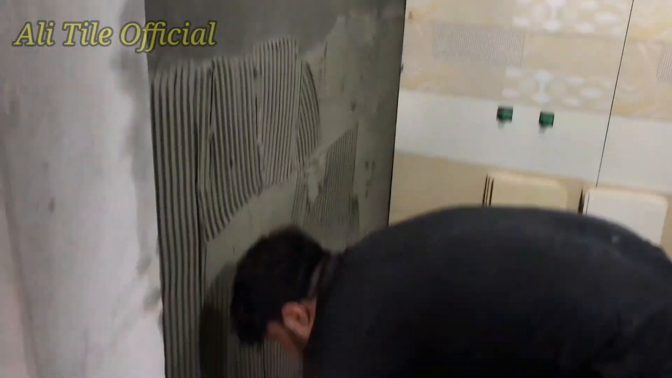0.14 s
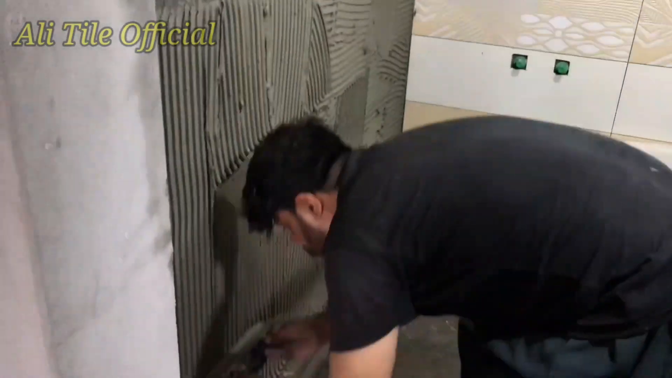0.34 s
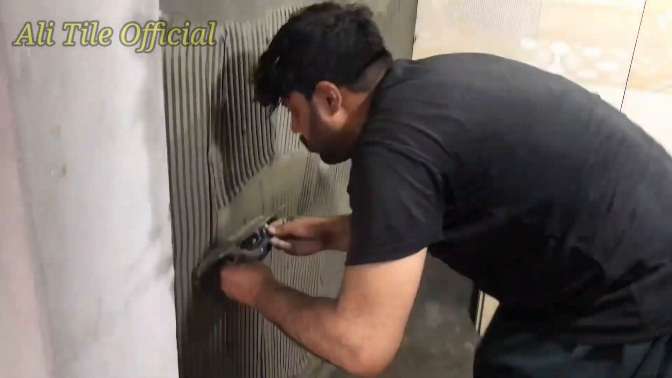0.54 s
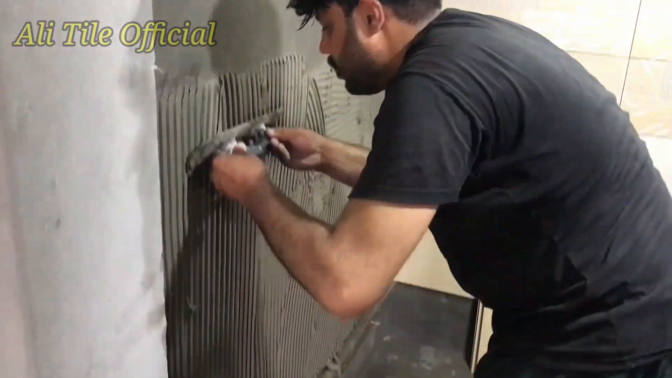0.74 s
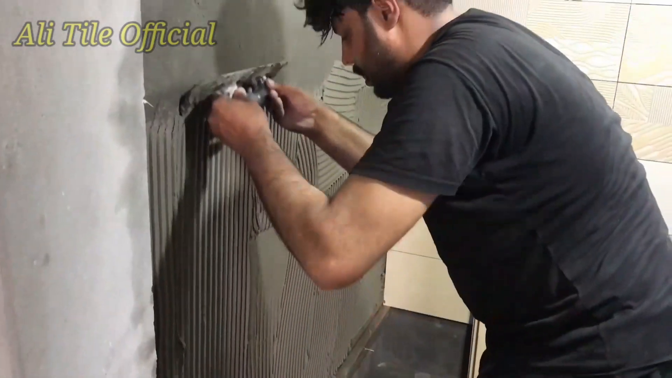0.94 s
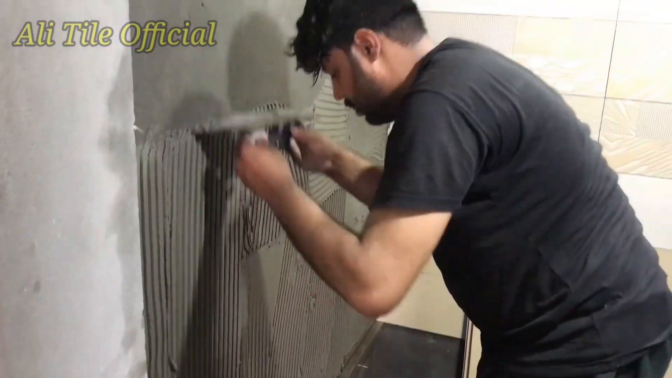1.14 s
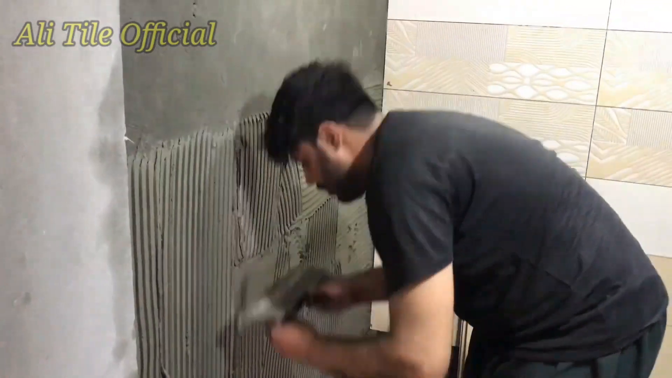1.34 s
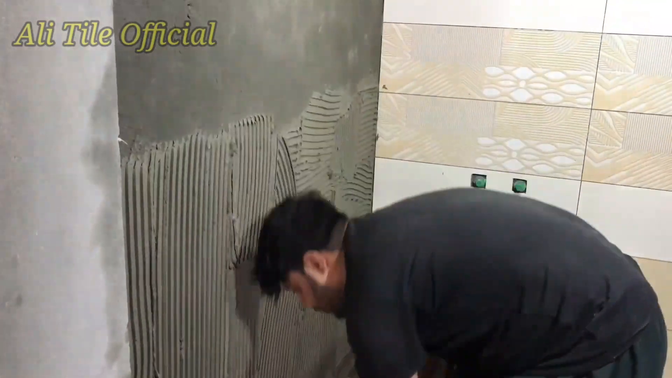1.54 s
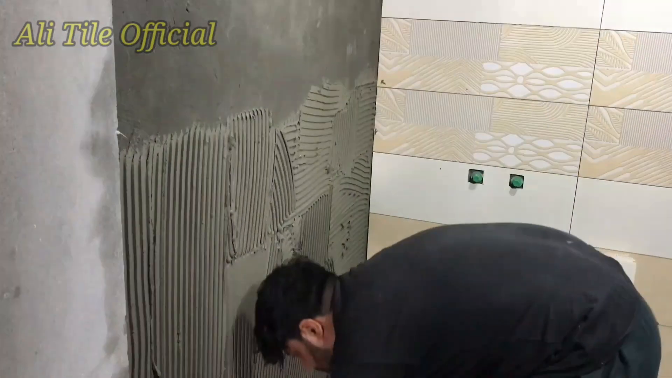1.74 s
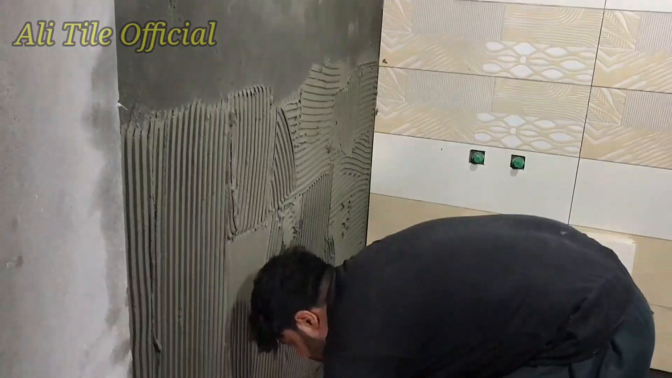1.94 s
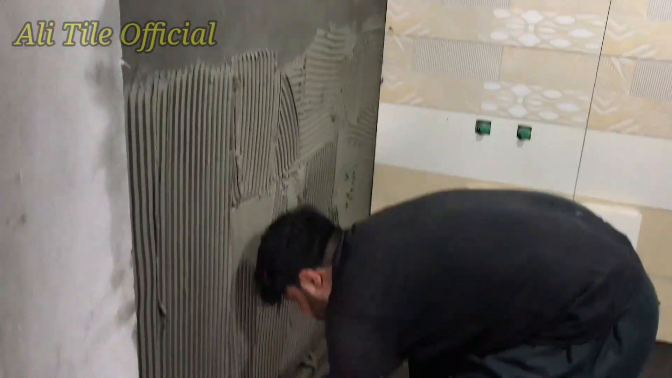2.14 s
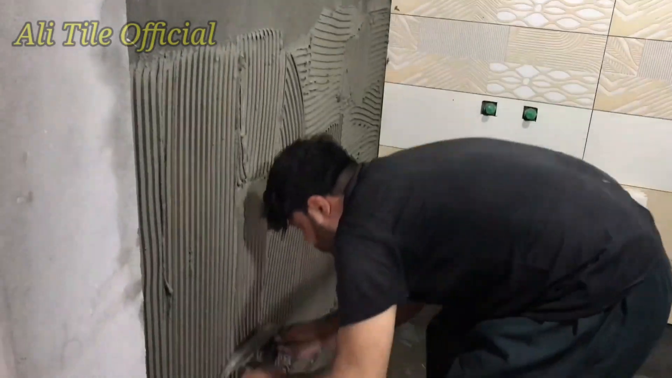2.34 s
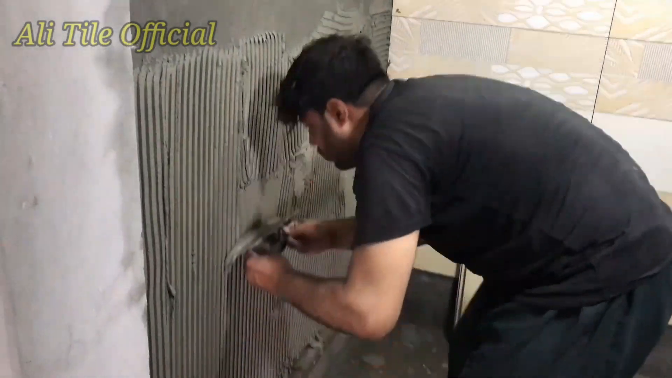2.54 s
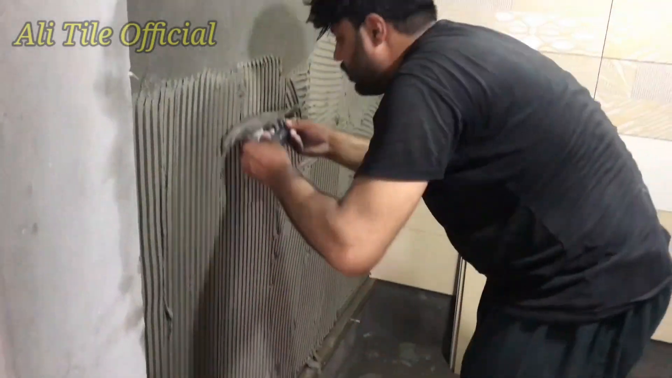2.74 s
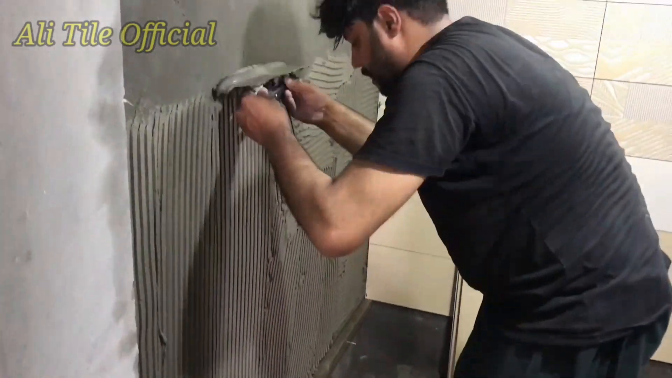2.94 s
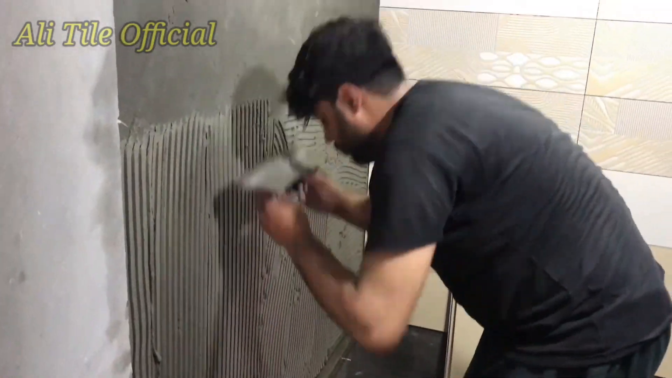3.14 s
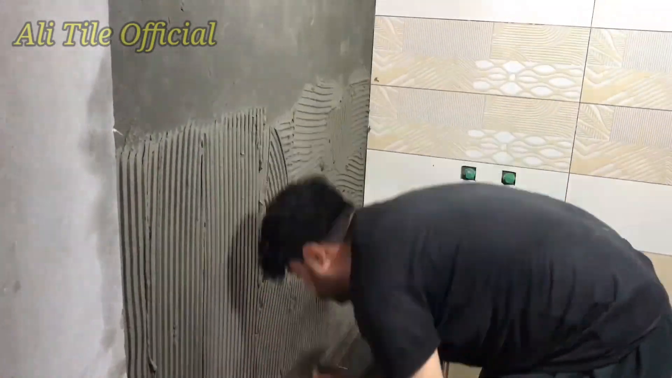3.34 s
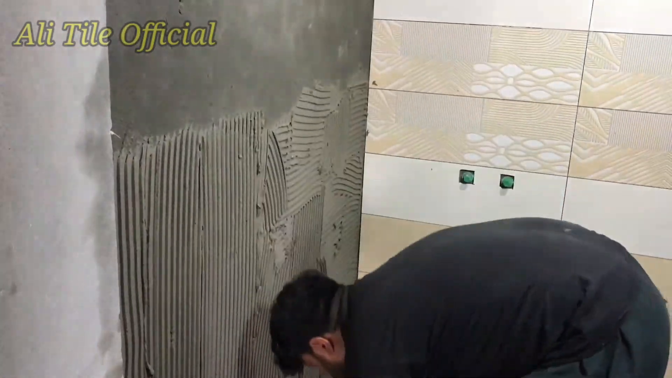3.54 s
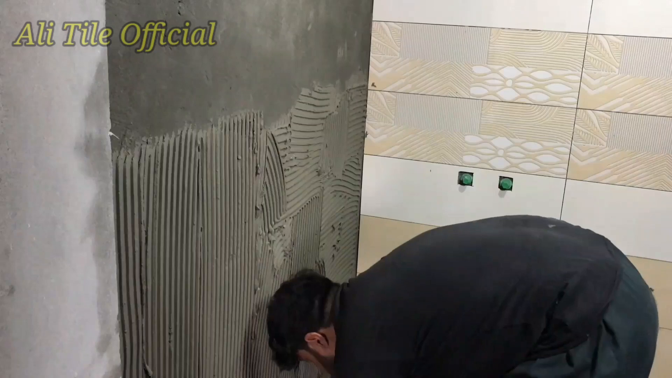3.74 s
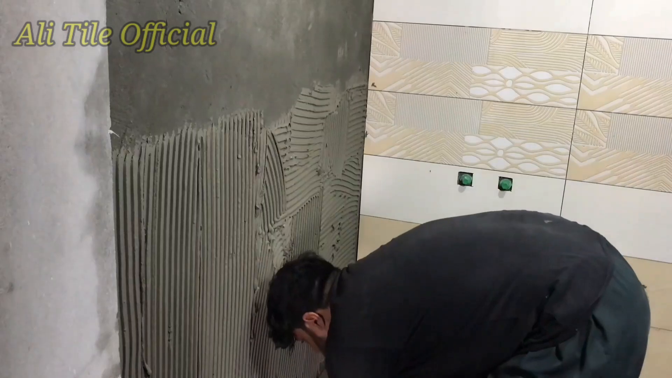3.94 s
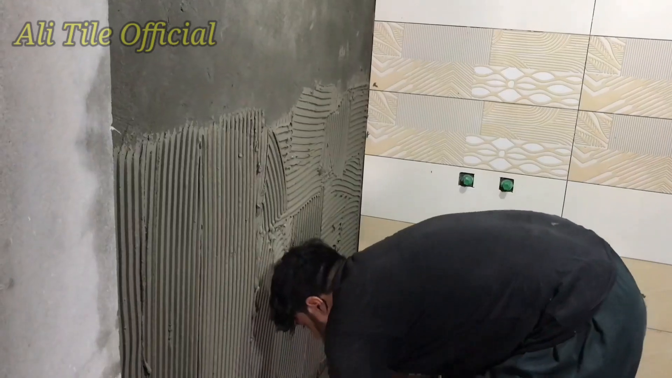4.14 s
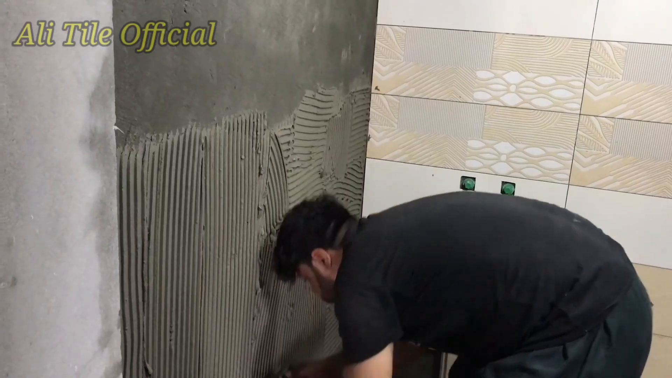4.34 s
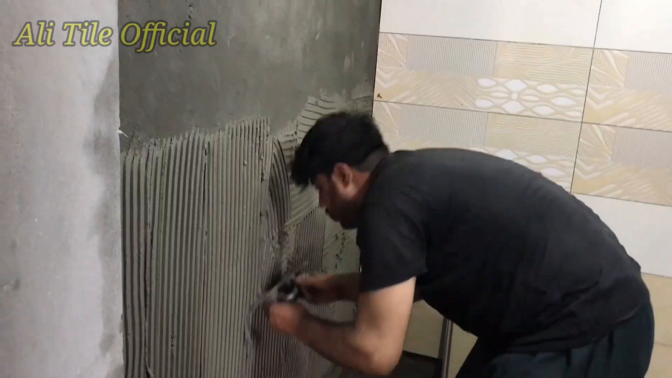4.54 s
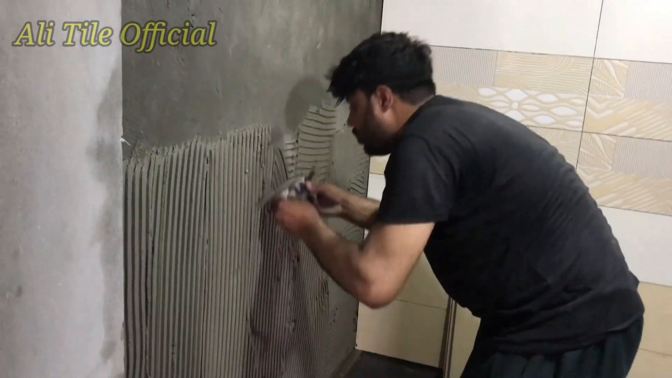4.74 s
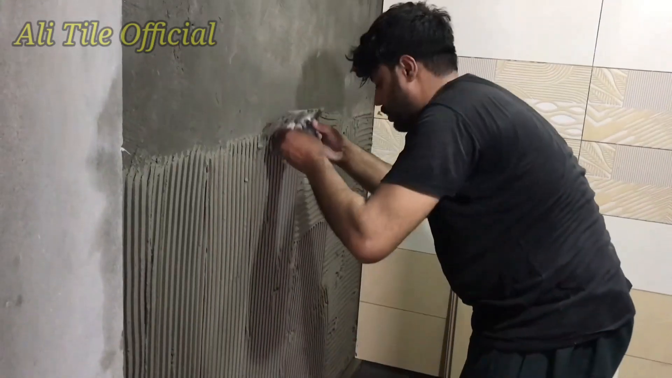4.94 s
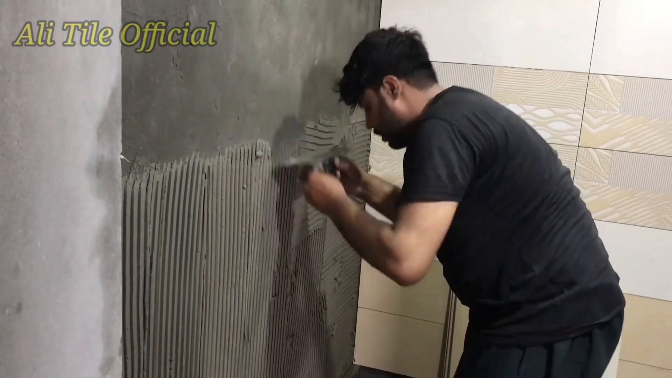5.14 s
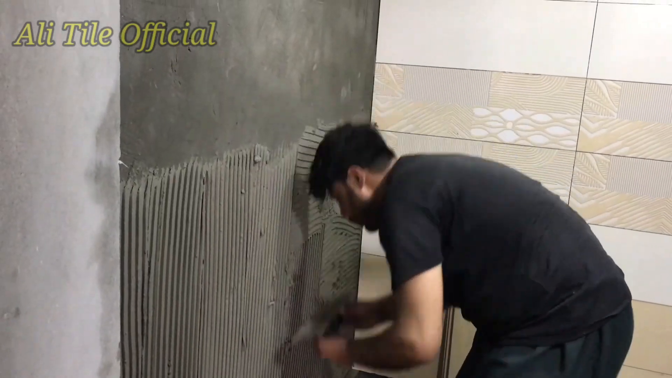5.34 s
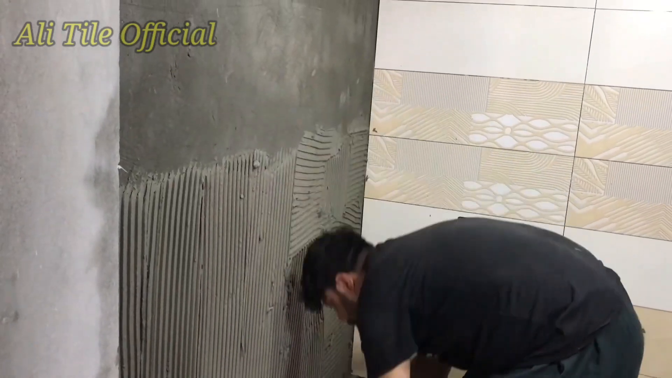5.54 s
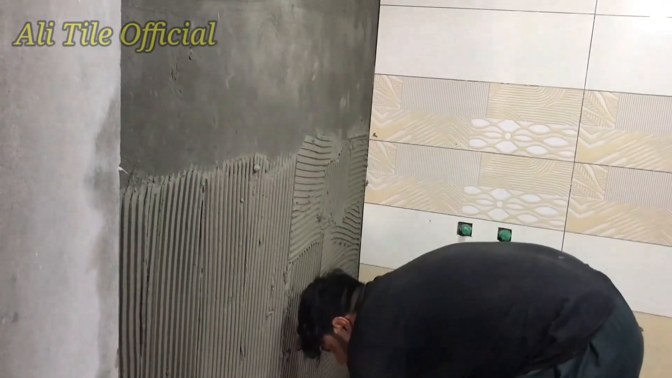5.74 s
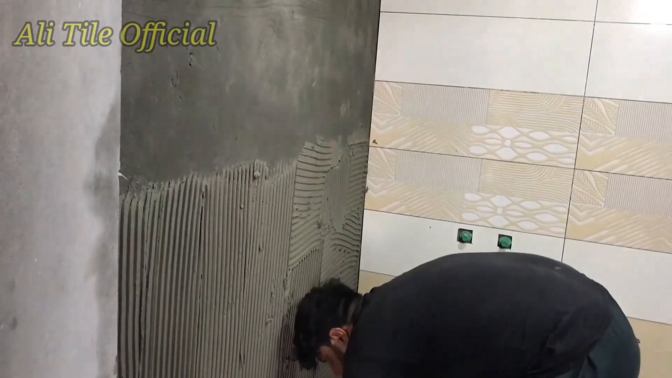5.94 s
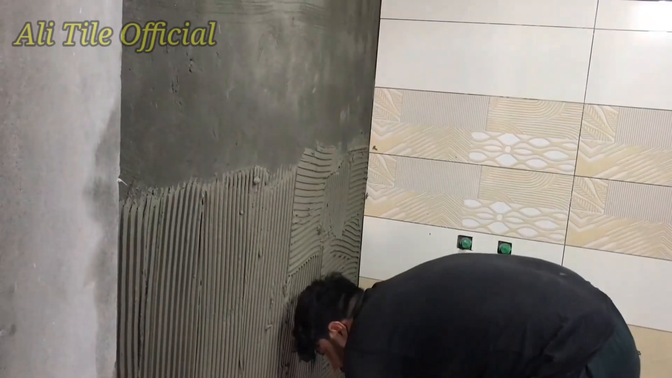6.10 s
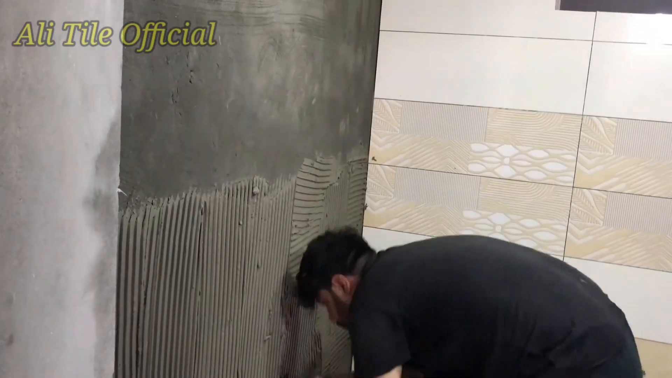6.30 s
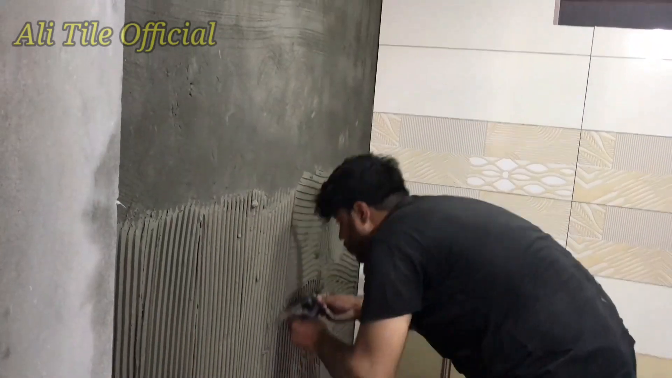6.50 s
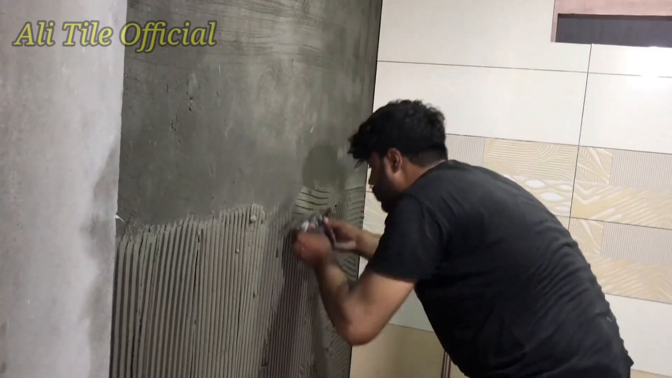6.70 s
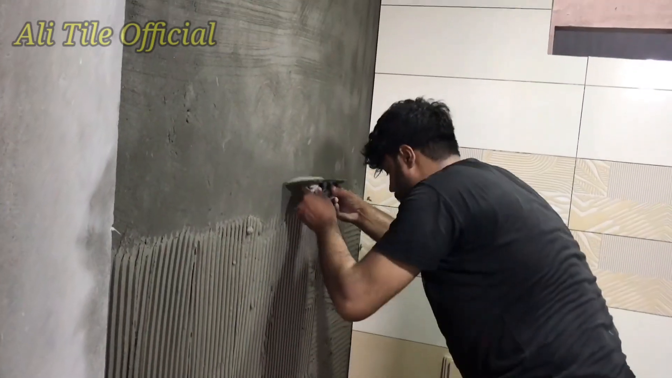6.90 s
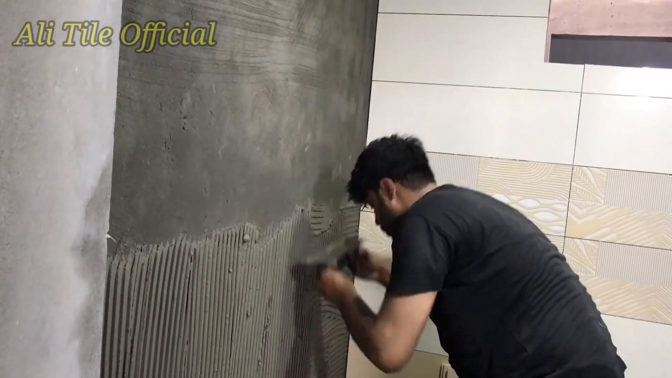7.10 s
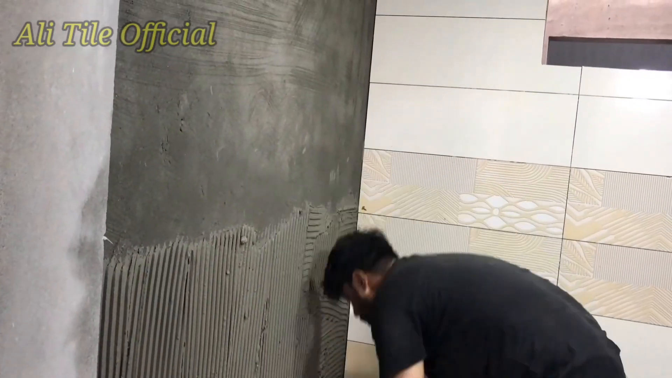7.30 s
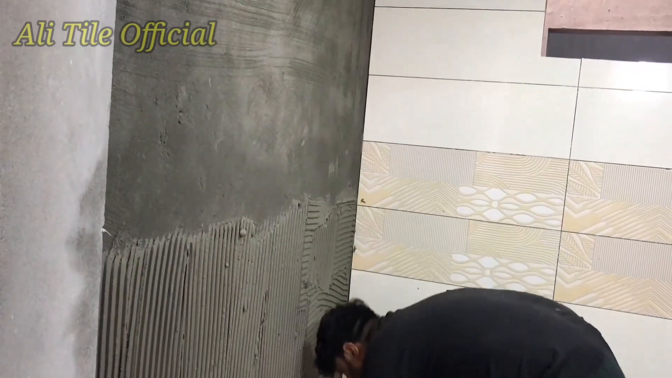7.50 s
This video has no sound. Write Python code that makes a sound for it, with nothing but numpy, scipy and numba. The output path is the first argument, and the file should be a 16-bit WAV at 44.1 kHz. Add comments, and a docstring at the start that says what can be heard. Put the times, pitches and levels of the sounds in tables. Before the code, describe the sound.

In a bare, echoing bathroom, a notched steel trowel combs tile adhesive up a cement wall in four long, rasping strokes, with sand crunching under its edge. Between the strokes the blade knocks, clatters and rings briefly, and wet mortar is softly smeared. A faint hum and a low rumble lie underneath. The sound is mono, with plenty of room echo.

```python
"""A bare, echoing bathroom: a notched steel trowel combs tile adhesive up a cement wall in four long strokes.
The teeth catch and slip, shaking the mortar-damped blade, while sand is crushed under the edge.
Between strokes the blade clatters, rings and smears mortar as it is reloaded and set back on the wall.
A faint hum and a low rumble fill the room. Mono."""
import sys
import numpy as np
from scipy import signal
from scipy.fft import rfft, irfft
from scipy.io import wavfile
from scipy.ndimage import uniform_filter1d
from numba import njit

SR = 44100
rng = np.random.default_rng(int(sys.argv[2]) if len(sys.argv) > 2 else 0)


def dump(signal):
    """Clip the signal to [-1, 1] and save it as 16-bit WAV at the path in sys.argv[1]."""
    limited = np.clip(np.atleast_2d(signal).T, -1, 1)
    pcm = np.round(limited * 32767).astype(np.int16)
    wavfile.write(sys.argv[1], SR, pcm)


N = 337805
TIME = np.arange(N) / SR

# Steel edge scraping in mortar. Each row: frequency in Hz, relative density in dB.
EDGE_SPECTRUM = [(600, -31), (1100, -21), (1500, 0.5), (1850, 0.5), (2150, -1.5), (2800, -4), (3600, -6),
                 (4400, -9), (5200, -23.5), (9000, -53)]
# Crushed sand. Each row: frequency in Hz, relative density in dB.
SAND_SPECTRUM = [(1500, -20.5), (3500, -1), (5000, 2), (5900, 3.5), (7000, 0.5), (7800, -1), (8700, 1),
                 (9600, 0), (10400, -4.5), (11500, 0), (13500, 1.5), (15500, -2)]


def from_db(db):
    """Decibels to gain."""
    return 10 ** (np.asarray(db) / 20)


def unit_rms(x):
    """Scale to rms 1."""
    return x / np.sqrt(np.mean(x ** 2) + 1e-20)


def at_hz(points, hz):
    """Interpolate each column on a log-frequency axis."""
    known_hz, *columns = np.transpose(points)
    return [np.interp(np.log(np.maximum(hz, 1)), np.log(known_hz), c) for c in columns]


def through(x, response):
    """Convolve with a response scaled to unit energy."""
    return signal.fftconvolve(x, response / np.linalg.norm(response))[:N]


def coloured(x, spectrum, size=4096):
    """Minimum-phase filter; white input keeps its power."""
    level_db, = at_hz(spectrum, np.fft.rfftfreq(size, 1 / SR))
    cepstrum = irfft(np.log(from_db(level_db)))
    cepstrum[size // 2:] = 0
    return through(x, irfft(np.exp(2 * rfft(cepstrum))))


def drift(rate_hz):
    """Smooth random wander; rms 1."""
    slow = rfft(rng.standard_normal(N)) / (1 + (np.fft.rfftfreq(N, 1 / SR) / rate_hz) ** 2)
    return unit_rms(irfft(slow, N))


def grains(per_s, spread_db):
    """Random clicks of uneven size and sign; rms 1."""
    sizes = from_db(spread_db * np.minimum(rng.exponential(1, N), 4)) * rng.choice([-1, 1], N)
    return unit_rms(sizes * (rng.random(N) < per_s / SR))


def resonant_noise(modes):
    """Noise in narrow resonances, levelled to rms 1."""
    hz = np.fft.rfftfreq(N, 1 / SR)
    shape = sum(from_db(db) / np.sqrt(width_hz) / (1 + ((hz - centre_hz) / width_hz) ** 2)
                for centre_hz, width_hz, db in modes)
    noise = irfft(rfft(rng.standard_normal(N)) * shape, N)
    return noise / np.sqrt(uniform_filter1d(noise ** 2, size=SR // 8))


def rumble():
    """Far rumble booming in the building's low resonances."""
    # Each row: centre in Hz, width in Hz, relative level in dB.
    deep_modes = [(49.8, 2.8, 6), (59.7, 6.8, -4)]
    boom_modes = [(90.3, 2.6, -1.5), (110, 8.3, -8.5), (133.5, 28, -6)]
    # Envelopes. Each row: time in seconds, relative level in dB.
    deep_levels = [(0.0, -53), (0.04, -41.5), (0.72, -53), (3.62, -39.5), (4.54, -51), (4.69, -39.5),
                   (5.25, -52), (6.36, -58), (7.66, -52)]
    boom_levels = [(0, -49.5), (1.6, -51), (2.2, -44.5), (4.4, -43), (6.1, -41), (6.5, -46.5),
                   (7.66, -49.5)]
    deep = from_db(np.interp(TIME, *np.transpose(deep_levels)) - 2.0) * resonant_noise(deep_modes)
    boom = from_db(np.interp(TIME, *np.transpose(boom_levels))) * resonant_noise(boom_modes)
    return deep + boom


def drone():
    """A low tone that swells and sags in pitch."""
    # Each row: time in seconds, pitch in Hz, level in dB.
    track = [(0, 126, -47.5), (1.0, 129.6, -49), (1.6, 125.2, -41), (2.7, 125.3, -46.5), (4.1, 118, -33.5),
             (4.62, 114, -50), (5.1, 115.1, -37.5), (6.2, 112.4, -38.5), (6.45, 130.4, -44.5),
             (7.66, 129.2, -52)]
    times_s, hz, db = np.transpose(track)
    cycles = np.cumsum(np.interp(TIME, times_s, hz) + 2.29 * drift(8.24)) / SR
    return from_db(np.interp(TIME, times_s, db) + 2.8 * drift(6.4)) * np.sin(2 * np.pi * cycles)


def hum():
    """Faint tones wavering in level and phase."""
    # Each row: frequency in Hz, level in dB.
    tones = [(152, -51.5), (252, -59), (273, -57), (314, -54)]
    return sum(from_db(db + 3.3 * drift(1.4)) * np.sin(2 * np.pi * hz * TIME + 1.2 * drift(1.3))
               for hz, db in tones)


def air(level_db=-47.5):
    """Steady noise of still air."""
    # Each row: frequency in Hz, relative density in dB.
    spectrum = [(30, -32), (60, -10.5), (150, -0.5), (205, -7), (320, 2.5), (450, -11), (800, -7),
                (1500, -17.5), (4000, -28), (9000, -35), (15500, -30)]
    return from_db(level_db) * coloured(rng.standard_normal(N), spectrum)


def bathroom(dry, early_t60_s=0.3, spots_per_s=42, spots=8, size=3 * SR // 2):
    """Direct sound, dense reflections off near walls, and a long tail weaker in the treble."""
    # Each row: frequency in Hz, tail T60 in seconds, tail and early reflections in dB re direct sound.
    reverb = [(150, 1.7, 21.5, -5), (396, 1.66, 6, -15), (890, 1.77, 4.5, 0), (2040, 1.47, 2, 5),
              (4050, 1.45, -2, 0), (8050, 0.99, -2.5, 3), (15100, 1, -31, -3.5)]
    t = np.arange(size) / SR
    edges_hz = np.geomspace(90, 18000, 12)
    white = rng.standard_normal((2, spots, size)) / np.sqrt(SR)
    responses, balance = 1.0 * (t == 0), []
    for k, (low, high) in enumerate(zip(edges_hz, edges_hz[1:])):
        hz = np.sqrt(low * high)
        tail_t60_s, tail_db, early_db = at_hz(reverb, hz)
        power = sum(from_db(2 * (db - 60 * t / t60_s)) * np.log(1e6) / t60_s
                    for t60_s, db in [(tail_t60_s, tail_db), (early_t60_s, early_db)])
        band = signal.butter(2, [low, high], "band", fs=SR, output="sos")
        responses = responses + signal.sosfilt(band, white[k % 2] * np.sqrt(power) * (t > .002))
        balance.append((hz, -10 * np.log10(1 + power.sum() / SR)))
    dry = coloured(dry, balance)  # offsets the room's overall colour
    # As the trowel travels, one reflection pattern fades into the next.
    distance = (spots_per_s * TIME - np.arange(spots)[:, None]) % spots - spots / 2
    shares = np.maximum(1 - np.abs(distance), 0) ** 0.59
    return sum(through(dry * share, response) for share, response in zip(shares, responses))


def wipes():
    """Wet mortar smears without ringing the blade: soft touches, and uneven rubbing on loading."""
    # Each row: peak time in seconds, half-length in seconds, relative level in dB.
    swells = [ (1.408, 0.034, -28), (2.433, 0.082, -30), (3.305, 0.035, -38.5), (3.532, 0.047, -44.5),
              (4.332, 0.019, -21), (5.280, 0.047, -38), (5.435, 0.024, -24.5), (6.276, 0.015, -23),
              (7.155, 0.013, -31)]
    # Each row: start in seconds, end in seconds, relative level in dB.
    loadings = [(1.96, 2.12, -38.5), (4.06, 4.41, -33.5), (5.986, 6.25, -37.5)]
    touches = sum(from_db(db) * np.exp(-((TIME - peak_s) / half_s) ** 2) for peak_s, half_s, db in swells)
    rubbing = sum(from_db(db) * ((TIME > start_s) & (TIME < end_s)) for start_s, end_s, db in loadings)
    rubbing *= from_db(-2 * drift(15))
    smear = (touches + rubbing) * grains(per_s=4000, spread_db=0.5)
    grit = from_db(-4) * coloured(smear, SAND_SPECTRUM)
    return from_db(-4.0) * (coloured(smear, EDGE_SPECTRUM) + grit)


def struck(modes, start_s, spot_hz, favour_db, rise_s=0.0075):
    """Decaying modes; the strike spot favours those near spot_hz."""
    t = np.arange(SR) / SR
    hz, db, t60_s = np.transpose(modes)[:, :, None]
    db = db + favour_db * np.exp(-(np.log2(hz / spot_hz) * 6) ** 2)
    partials = from_db(db - 60 * t / t60_s) * np.sin(2 * np.pi * hz * t)
    ring = rng.choice([-1, 1], len(hz)) @ partials
    build_up = 1 - np.exp(-t / rise_s)
    return np.pad(ring * build_up, (round(start_s * SR), N))[:N]


def knocks(impact_boost=0.3, impact_s=0.011, usual_drag_s=0.1):
    """The blade lands sharply, then drags in chattering contacts. Returns blows and ringing."""
    # Each row: start and drag length in seconds; steel, sand and thud in relative dB; favoured Hz.
    hits = [ (0.036, 0.049, -28.5, -41, -42, 1520), (0.723, 0.01, -30, -42, -50, 1600),
            (1.518, 0.044, -31.5, -45.5, -50, 1850), (1.884, 0.055, -22.5, -29, -37.5, 4480),
            (1.948, 0.054, -27, -38, -60, 1810), (2.176, 0.032, -35.5, -36.5, -60, 1900),
            (2.32, 0.013, -36, -39.5, -55, 1070), (2.44, 0.017, -30, -30, -46, 700),
            (2.758, 0.016, -30, -32, -33, 1500), (3.591, 0.036, -28.5, -27, -21.5, 325),
            (3.98, 0.012, -26, -43, -21, 550), (3.991, 0.067, -14, -22, -40, 1083),
            (5.854, 0.13, -22.5, -33.5, -36.5, 1620), (6.09, 0.02, -28, -42, -60, 3100),
            (6.143, 0.01, -26.5, -39, -60, 1580), (7.252, 0.022, -39, -41.5, -70, 3500)]
    # Free blade in the room; dull ring under it. Each row: pitch in Hz, relative dB, T60 in seconds.
    blade_modes = [(378, -7, 1.0), (548, -6, .65), (615, -12, .5), (856, -6, .7), (1060, -8, .4),
                   (1178, -4, 1.1), (1310, -9, .45), (1505, -5, .6), (1625, -3, 1.0), (1765, -4, .7),
                   (2140, -5, .4), (2575, -3, .5), (2785, 0, .5), (2968, -1, .4), (3330, -2, .35),
                   (4092, 4, .25), (4365, 1, .22), (5290, -6, .2)]
    hollow_modes = [(303, 0, 0.31), (343, -2, 0.63), (364, -15, .45)]
    # Dry crack; hollow thud. Each row: frequency in Hz, relative density in dB.
    crack_spectrum = [(250, -35.5), (460, -11), (560, 6), (750, -1.5), (1150, 4.5), (1700, 7), (2200, 2.5),
                      (2900, 4), (3600, -2), (4400, -3.5), (5200, -14), (9000, -19.5)]
    thud_spectrum = [(120, -0.5), (240, -15), (325, 7), (380, -1.5), (460, -8), (800, -1.5), (1400, -24),
                     (4000, -78)]
    force, ringing = np.zeros((3, N)), np.zeros(N)
    for start_s, drag_s, steel_db, sand_db, thud_db, spot_hz in hits:
        age_s = np.maximum(TIME - start_s, 0)
        contact = (TIME >= start_s) * np.exp(-np.minimum(age_s / drag_s, 3) ** 4)
        landing = 1 + impact_boost * np.exp(-age_s / impact_s)
        force += from_db([[steel_db], [sand_db], [thud_db]]) * contact * landing
        drive = np.sqrt(drag_s / usual_drag_s)  # a longer drag feeds in more energy
        ringing += drive * from_db(steel_db - 12) * struck(blade_modes, start_s, spot_hz, favour_db=11)
        ringing += drive * from_db(thud_db - 11) * struck(hollow_modes, start_s, spot_hz, favour_db=4)
    steel, sand, hollow = force
    chatter = grains(per_s=3900, spread_db=4.5)
    crack = from_db(1.5) * coloured(steel * chatter, crack_spectrum)
    grit = from_db(2.5) * coloured(sand * grains(per_s=8200, spread_db=-1.5), SAND_SPECTRUM)
    thud = from_db(0.5) * coloured(hollow * chatter, thud_spectrum)
    return crack + grit + thud, ringing


@njit
def moving_resonance(x, radians, radius):
    """Two-pole band-pass with a gliding centre; peak gain 1."""
    y = np.zeros(len(x))
    for i in range(2, len(x)):
        drive = (1 - radius ** 2) / 2 * (x[i] - x[i - 2])
        y[i] = drive + 2 * radius * np.cos(radians[i]) * y[i - 1] - radius ** 2 * y[i - 2]
    return y


def pressed_blade(slips, glide, width_hz=360):
    """The mortar-damped blade rasps, with one broad, gliding resonance."""
    # Each row: frequency in Hz, relative density in dB.
    rasp_spectrum = [(150, -34), (280, -15), (400, -11), (480, -12.5), (570, -4), (700, 1.5), (1000, 1.5),
                     (1270, 1), (1600, -16.5), (2500, -44), (6000, -55)]
    body = coloured(slips, rasp_spectrum)
    hz = np.interp(TIME, *np.transpose(glide))
    resonance = moving_resonance(body, 2 * np.pi * hz / SR, np.exp(-np.pi * width_hz / SR))
    return body + from_db(-2.0) * resonance


def strokes(landing_s=0.028, lifting_s=0.054, release_s=0.028, usual_db=-27, usual_hz=886):
    """Teeth catch and slip, shaking the blade, as the edge crushes sand; pressure drives every layer."""
    # One list a stroke. Each point: time in seconds, pressure as a relative level in dB.
    pressures = [
        [(0.19, -37.5), (0.272, -39), (0.282, -40.5), (0.562, -27), (0.718, -41.5), (0.726, -34.5),
         (1.01, -29.5), (1.05, -31)],
        [(2.448, -31.5), (2.564, -26), (2.634, -27), (2.682, -38.5), (2.752, -38), (2.764, -31), (2.926, -29),
         (2.98, -36)],
        [(4.412, -26.5), (4.554, -23.5), (4.736, -32), (4.8, -25.5), (4.998, -32), (5.006, -26), (5.06, -29.5)],
        [(6.345, -26), (6.431, -25), (6.513, -30), (6.785, -25), (6.871, -30), (6.933, -25), (6.96, -28.5)],
    ]
    # Each row: bite time in seconds; blade shake over sand, landing judder and lifting judder in dB;
    # blade resonance at the bottom and at the top in Hz.
    gestures = [ (0.049, 2, 0, 4.5, 850, 630), (0.024, 3, 13.5, 4, 530, 490),
                (0.074, 2, 7.5, 11, 1430, 860), (0.093, 1.5, 1.5, 6.5, 1030, 900)]
    # Layer responses. Each: offset in dB, then dB per pressure dB, per resonance octave, per judder dB.
    rasp_law = (-0.91, 1.11, -1.05, 0.73)
    edge_law = (0.64, 1.15, 1.8, 0.35)
    sand_law = (-0.29, 1.23, -0.4, 0.0025)
    force, glide = np.zeros((3, N)), []
    for pressure, gesture in zip(pressures, gestures):
        bite_s, shake_db, landing_db, lifting_db, bottom_hz, top_hz = gesture
        times_s, pressure_db = np.transpose(pressure)
        start_s, end_s = times_s[0], times_s[-1]
        glide += [(start_s, bottom_hz), (end_s, top_hz)]  # the blade tilts on the way up
        contact = np.interp(TIME, [start_s - bite_s, start_s, end_s, end_s + release_s], [0, 1, 1, 0]) ** 2
        push_db = np.interp(TIME, times_s, pressure_db) - usual_db
        octaves = np.log2(np.interp(TIME, [start_s, end_s], [bottom_hz, top_hz]) / usual_hz)
        judder_db = np.interp(TIME, [start_s, start_s + landing_s, end_s - lifting_s, end_s],
                              [landing_db, 0, 0, lifting_db])
        layers_db = np.array([db + per_push * push_db + per_octave * octaves + per_judder * judder_db
                              for db, per_push, per_octave, per_judder in (rasp_law, edge_law, sand_law)])
        force += contact * from_db(usual_db + layers_db + [[shake_db], [shake_db], [0]])
    rasp, edge, sand = force * from_db(drift(39))  # lumps make the blade judder
    slips = grains(per_s=2000, spread_db=3.5) * from_db(1.1 * drift(16.5))  # the teeth bite unevenly
    scrape = from_db(1.0) * coloured(slips * edge, EDGE_SPECTRUM)
    grit = from_db(2.5) * coloured(sand * grains(per_s=5000, spread_db=1.0), SAND_SPECTRUM)
    return pressed_blade(slips * rasp, glide) + scrape + grit


def scene():
    """Trowel in the room over the background; both channels alike."""
    blows, ringing = knocks()
    trowel = bathroom(strokes() + blows + wipes()) + ringing
    return np.tile(trowel + rumble() + drone() + hum() + air(), (2, 1))


def record(dry, cutoff_hz=15700):
    """Steep low-pass."""
    return signal.sosfilt(signal.ellip(12, .1, 80, cutoff_hz, fs=SR, output="sos"), dry)


dry = scene()
out = record(dry)
dump(out)
```